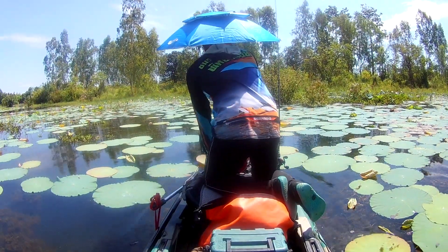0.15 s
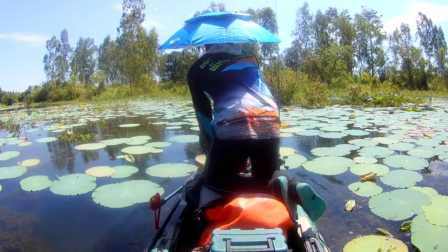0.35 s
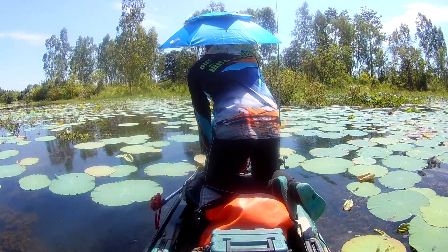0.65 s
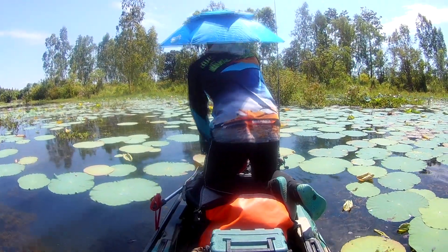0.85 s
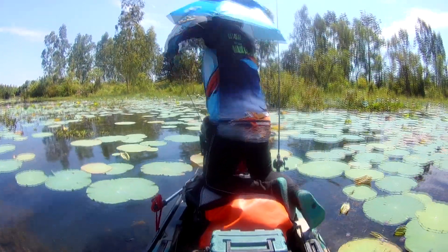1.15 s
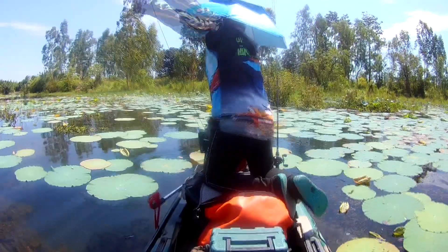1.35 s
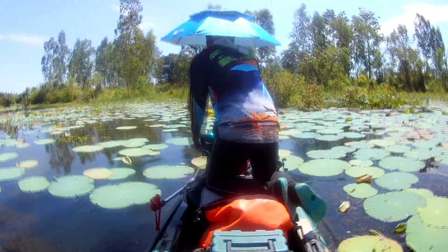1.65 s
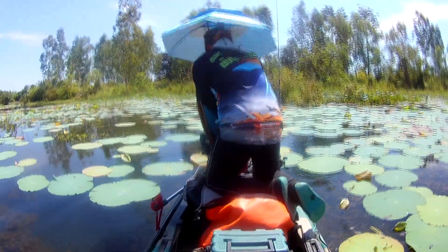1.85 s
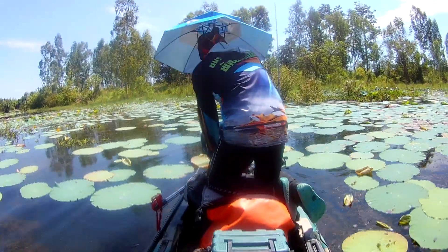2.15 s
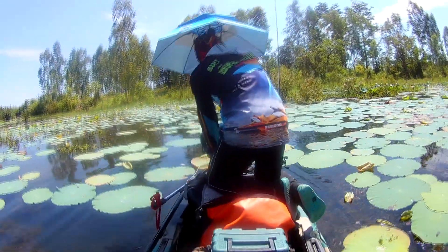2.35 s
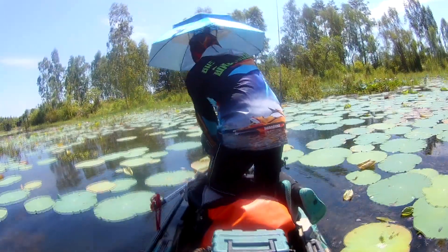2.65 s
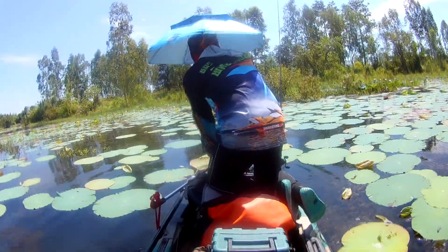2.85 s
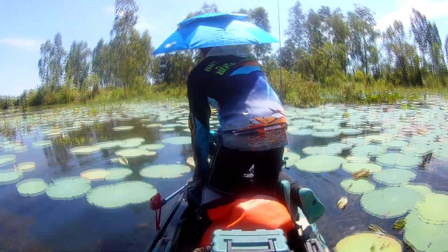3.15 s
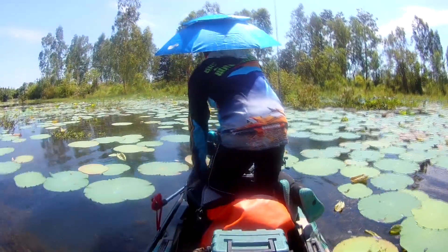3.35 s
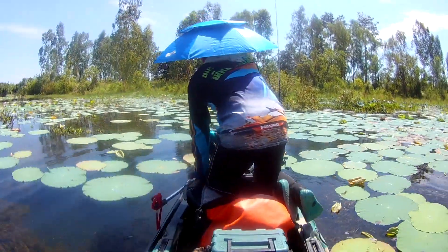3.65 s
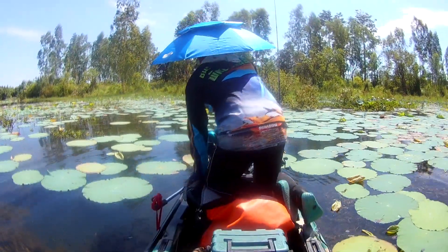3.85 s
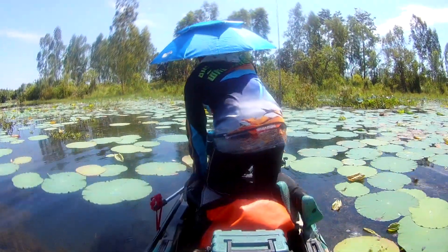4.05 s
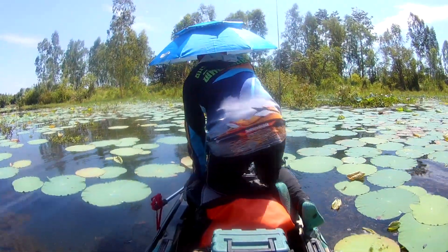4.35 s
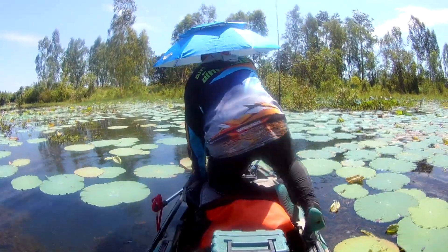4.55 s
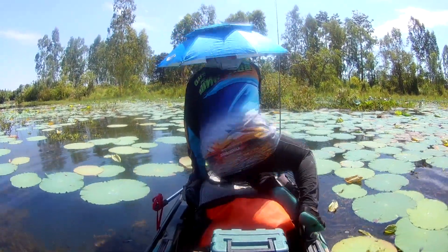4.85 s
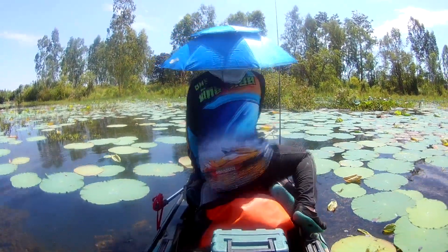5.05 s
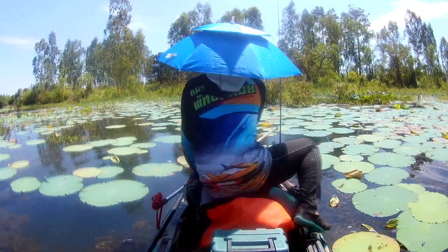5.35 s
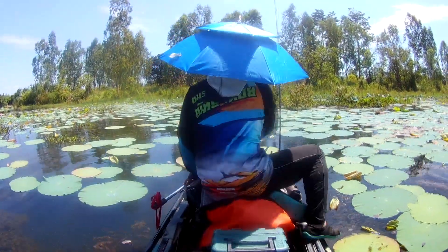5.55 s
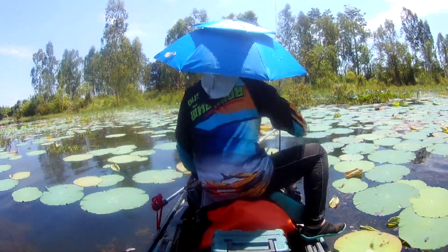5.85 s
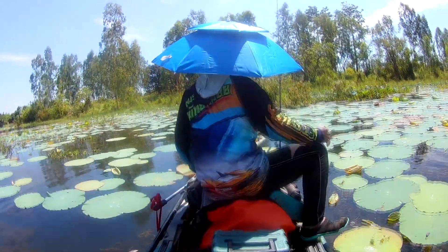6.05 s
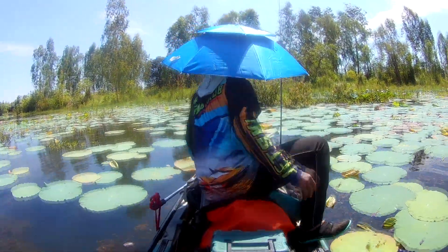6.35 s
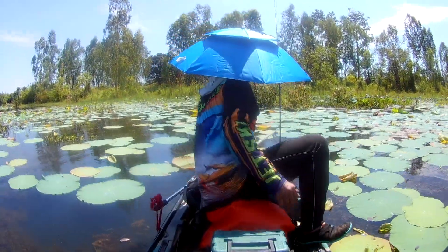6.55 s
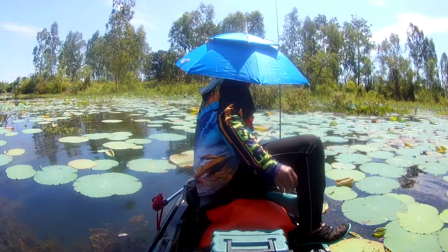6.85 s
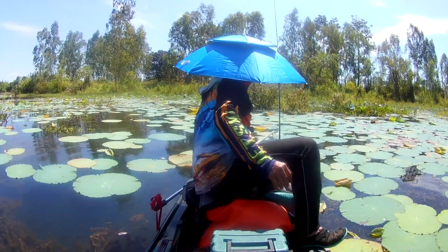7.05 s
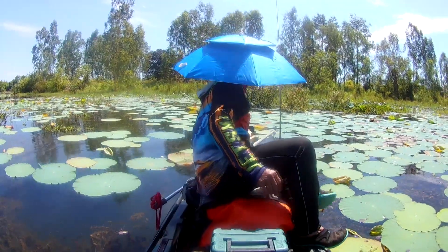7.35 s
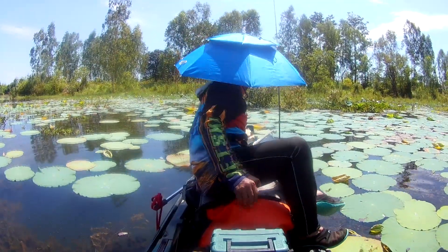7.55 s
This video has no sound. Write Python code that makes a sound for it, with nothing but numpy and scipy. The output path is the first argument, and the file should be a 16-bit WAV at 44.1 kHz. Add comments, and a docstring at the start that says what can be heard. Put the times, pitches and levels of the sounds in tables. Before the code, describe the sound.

A small one-cylinder boat engine is pull-started on a quiet pond, then idles with muffled thumps, rattling gear and jingling metal.

```python
"""On a quiet pond, a small one-cylinder boat engine is pull-started and idles, heard from a closed case
on the hull. First come lapping water, a few handling taps and two faint bird whistles; then the
starter clanks and the boat wallows. Each firing thumps and jolts loose gear, which rattles in surges
through the hull. The engine knocks on its mount, metal parts jingle, and the valves tick until the
engine settles. The case adds a hollow note and muffles the sounds that come through its wall."""
import sys
import numpy as np
from scipy import signal
from scipy.io import wavfile
from scipy.ndimage import uniform_filter1d

SR = 44100
rng = np.random.default_rng(int(sys.argv[2]) if len(sys.argv) > 2 else 0)


def transcribe(signal):
    """Save signal, clipped to [-1, 1], as a 16-bit WAV file at the path in sys.argv[1]."""
    frames = np.atleast_2d(signal).T
    limited = np.clip(frames, -1, 1)
    pcm = np.round(limited * 32767).astype(np.int16)
    wavfile.write(sys.argv[1], SR, pcm)


N = 339570
T = np.arange(N) / SR


def gain_of(db):
    """Turns decibels into a number to multiply by."""
    return 10 ** (np.asarray(db) / 20)


def evened(x):
    """Scales a sound to an average (rms) strength of 1."""
    return x / np.sqrt(np.mean(x ** 2) + 1e-20)


def curve(rows, column, before=-120):
    """Joins a table column with straight lines over time; it starts out at `before`."""
    rows = np.array(rows)
    return np.interp(T, rows[:, 0], rows[:, column], left=before)


def wander(step_s):
    """A wavering line with a new random value every step."""
    knots = np.arange(0, T[-1] + 1, step_s)
    return np.interp(T, knots, rng.standard_normal(len(knots)))


def add(mix, s, sound):
    """Mixes a short sound in at s seconds."""
    part = mix[max(round(s * SR), 0):][:len(sound)]
    part += sound[:len(part)]


def coloured(x, points):
    """Gives a sound the tone colour of (f/Hz, level/dB) points; clicks keep their sharp start."""
    hz, db = np.transpose(points)
    size = 8192
    grid = abs(np.fft.fftfreq(size, 1 / SR))
    grid_db = np.interp(np.log(grid + 1), np.log(hz + 1), db)
    log_gain = np.log(gain_of(np.maximum(grid_db, -100)))
    response = np.exp(np.conj(signal.hilbert(log_gain)))  # nothing rings ahead of a click
    taps = np.fft.ifft(response).real[:size // 2]
    return evened(signal.oaconvolve(x, taps)[:len(x)])


def ring(x, hz, width):
    """Makes a sound ring at one pitch; a smaller width rings longer."""
    r = np.exp(-np.pi * width / SR)
    return 2 * signal.lfilter([1 - r], [1, -r * np.exp(2j * np.pi * hz / SR)], x).real


def clear_ring(x, hz, width):
    """Rings twice over for a cleaner note, at strength 1."""
    return evened(ring(ring(x, hz, width), hz, width))


def rings(x, notes):
    """An object that rings at several (f/Hz, width/Hz, level/dB) notes at once."""
    return sum(gain_of(db) * clear_ring(x, hz, width) for hz, width, db in notes)


def chatter(per_s, spread_db, hiss):
    """Random hits of very unequal size, over a hiss of hits too many to tell apart."""
    size = gain_of(spread_db * np.minimum(rng.exponential(1, N), 4))
    sign = rng.choice([-1., 1.], N)
    hit = rng.random(N) < per_s / SR
    return evened(size * sign * hit) + hiss * rng.standard_normal(N)


# tone colour of air and water: f/Hz, level/dB
POND_COLOUR = [(12, -27), (20, 8.5), (42, 3), (81, -5), (137, -1), (454, -16.5), (567, -14.5), (1140, -23),
               (1270, -21.5), (3880, -38), (15600, -56.5)]

def pond():
    """Soft air noise and small lapping waves, heard through the case."""
    return gain_of(-56.5) * coloured(chatter(per_s=36, spread_db=3, hiss=2.8), POND_COLOUR)


# bird calls, one list for each whistle: t/s, f/Hz, level/dB
BIRD_WHISTLES = [
    [(0.38, 2650, -87), (0.41, 2838, -82), (0.456, 2992, -79), (0.48, 2887, -90)],
    [(0.65, 2684, -88), (0.698, 2692, -81), (0.746, 2630, -86), (0.78, 2758, -85), (0.79, 2691, -97)],
]

def bird():
    """A far bird whistles pure, sliding tones."""
    out = np.zeros(N)
    for rows in BIRD_WHISTLES:
        s, hz, db = np.transpose(rows)
        t = np.arange(s[0], s[-1], 1 / SR)
        phase = 2 * np.pi * np.cumsum(np.interp(t, s, hz)) / SR
        add(out, s[0], np.sqrt(2) * gain_of(np.interp(t, s, db)) * np.sin(phase))
    return out


# swell of the water under the boat: t/s, level/dB
SLOSH = [(1.15, -70), (1.3, -47), (1.6, -42.5), (2.0, -45), (2.6, -62)]

def wallow():
    """The pull on the starter rocks the boat, and water sloshes deep under the hull."""
    level_db = np.where(T < SLOSH[-1][0], curve(SLOSH, 1), -120)
    return gain_of(level_db) * clear_ring(rng.standard_normal(N), hz=38, width=28)


# notes of the starter housing: f/Hz, width/Hz, level/dB
STARTER_NOTES = [(2500, 110, 8), (2720, 120, 2.5), (3610, 90, 0), (4340, 110, -0.5), (5070, 160, -4),
                 (6330, 90, -11)]
# taps and clanks: t/s, relative level/dB, body f/Hz, then ring, case and treble each as level/dB
# over the body, and last the time to fade by 60 dB, t/s
TAPS_AND_CLANKS = [(.003, -39, 670, -24, -15, -20, 0.24), (.03, -35.5, 1930, -22, -9, -10, 0.059),
                   (.357, -53, 1270, -4, 4, -30, 0.074), (.538, -43, 940, 4, 9, -50, 0.1),
                   (.877, -42.5, 685, 3, -1, 2, 0.035), (.902, -27.5, 1446, 4, 7.5, -28, 0.051),
                   (.945, -40, 600, -8, 8, -39, 0.053), (1.049, -28.5, 620, -4, 9.5, -30, 0.022),
                   (1.311, -19.5, 1555, 12.5, 10, -6, 0.05), (1.465, -19, 1010, -6, 9, -23, 0.13),
                   (1.834, -15, 1400, -13, 5, -8, 0.12)]

def clanks():
    """Handling taps and starter clanks: a dying scrape shakes the struck part, case and housing."""
    t, out = np.arange(6000) / SR, np.zeros(N)
    bright_band = signal.butter(4, [2700, 6300], "band", fs=SR, output="sos")
    for s, db, hz, ring_db, case_db, treble_db, fade_s in TAPS_AND_CLANKS:
        fade = gain_of(-60 * t / fade_s) * np.minimum(t / .0007, 1)
        scrape, fizz = fade * rng.standard_normal((2, len(t)))
        body_band = signal.butter(3, [hz / 1.9, hz * 1.37], "band", fs=SR, output="sos")
        body = evened(signal.sosfilt(body_band, scrape))
        body += gain_of(ring_db) * clear_ring(scrape, hz, 160)
        case = clear_ring(scrape, CASE_NOTES[0][0], 230)
        case += .45 * evened(ring(scrape, CASE_NOTES[1][0], 28))
        treble = .6 * evened(signal.sosfilt(bright_band, fizz)) + rings(fizz, STARTER_NOTES)
        clank = body + gain_of(case_db) * evened(case) + gain_of(treble_db) * evened(treble)
        add(out, s, gain_of(db - 13) * np.sqrt(np.mean(fade ** 2)) * clank)
    return out


# crisp snaps: t/s, relative level/dB
SNAP_HITS = [(0.8994, -62), (1.258, -61), (1.3124, -50), (1.4651, -63), (1.5958, -70), (1.701, -70),
             (1.8347, -58), (2.0443, -71), (2.2348, -66.5), (2.387, -63), (2.4643, -69), (2.5501, -65),
             (2.6339, -68), (3.2076, -72)]
# their tone colour: f/Hz, level/dB
SNAP_COLOUR = [(6000, -37.5), (8000, -3.5), (8900, 2.5), (10200, -5.5), (10800, -7.5), (12400, -0.5),
               (13300, -12.5), (15500, -20), (17000, -43)]

def snaps(fired):
    """Gritty, very high snaps arrive through the air; every firing adds a faint one."""
    t, level = np.arange(SR // 8) / SR, np.zeros(N)
    shape = gain_of(-60 * t / .05) * np.minimum(t / .001, 1)
    for hits, offset_db in [(SNAP_HITS, -8), (fired, -63.5)]:
        for s, db in hits:
            add(level, s, gain_of(db + offset_db) * shape)
    return level * coloured(chatter(1500, 2.5, .7), SNAP_COLOUR)


# ticks of the valve gear: t/s, relative level/dB
VALVE_TICKS = [(1.2378, -51), (1.2887, -52), (1.3113, -30.5), (1.345, -46), (1.3715, -42), (1.4036, -45),
               (1.4318, -50), (1.449, -46), (1.468, -32.5), (1.5236, -50), (1.5391, -49), (1.5601, -45),
               (1.586, -42), (1.6593, -43), (1.7541, -50), (1.7756, -50), (1.841, -32), (1.967, -53),
               (2.1223, -43), (2.1397, -45), (2.1722, -52), (2.1931, -50), (2.2161, -45), (2.2305, -41),
               (2.2605, -38), (2.3857, -46), (2.4416, -46), (2.4635, -46), (2.4825, -46), (2.557, -44),
               (2.6461, -44.5), (2.7229, -46), (2.7733, -52), (2.7972, -48), (2.8177, -49), (2.8875, -41),
               (2.9215, -50), (2.9399, -54), (3.0502, -46), (3.2088, -46), (3.3006, -50)]
TICK_HZ, TICK_WIDTH_HZ, SETTLED_S = 3520, 680, 3.3

def valve_ticks():
    """The valves tick with one broad metal ring until the engine settles; faint strays fall between."""
    t, out = np.arange(400) / SR, np.zeros(N)
    gap_s = 1 / 60  # between stray ticks, on average
    slots = np.arange(.91, SETTLED_S - gap_s, gap_s)
    late, loud = rng.random((len(slots), 2)).T
    before_firing = slots < ENGINE_PACE[0][1]
    strays = list(zip(slots + late * gap_s, -62.5 - 12 * before_firing + 12 * loud))
    for s, db in [(s, db - 3.5) for s, db in VALVE_TICKS] + strays:
        add(out, s, gain_of(db - 60 * t / .026) * rng.standard_normal(len(t)))
    width = 2.8 * TICK_WIDTH_HZ
    return gain_of(7) * ring(ring(out, TICK_HZ, width), TICK_HZ, width)


# how hard the boat shakes: t/s, rattle level/dB, then harsh band and treble as level/dB relative to it
BOAT_SHAKE = [(.84, -78, 2, -11), (.91, -55.5, 11, -3.5), (.93, -51.5, -5, -34), (1.2, -48.5, 2.5, -21),
              (1.27, -29.5, -8.5, -30), (1.42, -26, -11, -43), (1.47, -17, -6, -30), (1.53, -25, -8.5, -41),
              (1.64, -21, -8, -36), (1.76, -33, -7, -34), (1.93, -38.5, -2.5, -34), (2.08, -27, -9.5, -33),
              (2.16, -32, -4, -37), (2.29, -20.5, -2, -32), (2.35, -32, -6.5, -35), (2.8, -32.5, -4, -32.5),
              (3.19, -36.5, -5, -36), (3.34, -33.5, -3.5, -31), (3.46, -24.5, -7.5, -36.5),
              (3.59, -22.5, -3.5, -33.5), (3.69, -32.5, -5, -29), (3.8, -35.5, -4, -29),
              (3.9, -28, -5.5, -32), (4.41, -33.5, -7.5, -33.5), (4.53, -26.5, -6.5, -34),
              (4.62, -32, -5.5, -31), (4.715, -26.5, -4.5, -38), (4.75, -23, 1, -29.5),
              (4.81, -20.5, -3.5, -37), (4.895, -30, -7, -38), (4.935, -20.5, 0.5, -32),
              (4.97, -24.5, -5.5, -36), (5.07, -34, -5.5, -35.5), (5.23, -23.5, -5.5, -32.5),
              (5.32, -29, -8, -37), (5.46, -24, -4, -33.5), (5.54, -34.5, -4, -30), (5.64, -26, -8, -41),
              (5.7, -35, -4.5, -33), (5.77, -24.5, -5, -35), (5.9, -33.5, -7.5, -33.5),
              (6.34, -31.5, -6, -31.5), (6.4, -23.5, -5, -38), (6.51, -34.5, -8.5, -32),
              (6.8, -30.5, -6.5, -33), (6.86, -19.5, -7.5, -37), (6.95, -23.5, -8.5, -39),
              (7.03, -18, -6.5, -33.5), (7.14, -19, -5, -34.5), (7.24, -23.5, -8, -35.5),
              (7.32, -18, -5.5, -32.5), (7.45, -26.5, -10.5, -46), (7.6, -31.5, -9.5, -36.5),
              (7.65, -24.5, -8, -36), (7.7, -22.5, -9.5, -39)]
CALM_DB, CALM_TREBLE_DB = -29, -67.5  # shaking at a calm idle

def shaking():
    """The surges in dB: rattle over calm, treble over calm, and harsh band over rattle."""
    rattle_db, harsh_db, treble_db = (curve(BOAT_SHAKE, column) for column in (1, 2, 3))
    return rattle_db - CALM_DB, rattle_db + treble_db - CALM_TREBLE_DB, harsh_db


# how loudly the clearest metal rings: t/s, level/dB
RING_SWELLS = [(1.25, -75), (1.45, -77), (1.46, -50), (1.54, -73), (1.8, -80), (1.84, -62), (1.91, -78),
               (2.2, -72), (2.27, -52.5), (2.38, -80), (4.2, -73.5), (4.27, -84), (4.72, -72), (4.75, -58),
               (4.91, -69), (4.94, -55), (5.04, -75), (5.08, -71), (6.33, -78.5), (6.4, -67), (6.6, -80),
               (7.1, -57.5), (7.61, -77.5), (7.65, -64), (7.7, -74)]
# its notes: f/Hz, width/Hz, level/dB
RING_NOTES = [(3730, 55, 0), (4675, 80, -9), (2400, 40, 5)]

def ringing_metal(shared_hits):
    """Loose metal rings at a few clear notes, each struck by shared hits and by its own."""
    swell_db = curve(RING_SWELLS, 1)
    return sum(gain_of(swell_db + db) * clear_ring(shared_hits + chatter(89, 2.9, .25), hz, width)
               for hz, width, db in RING_NOTES)


# notes of the loose metal parts: f/Hz, width/Hz, level/dB
METAL_NOTES = [(3300, 65, -2.5), (4240, 49, -5.5), (5240, 45, 0.5), (5450, 44, 8), (6340, 70, -32),
               (7160, 40, -25.5), (8520, 140, -27), (9340, 63, -29), (9650, 50, -32), (10000, 80, -31),
               (11350, 60, -29), (12200, 94, -27.5), (12800, 75, -36)]
# bursts of jingling: t/s, relative level/dB
JINGLE_BURSTS = [(1.2513, -57), (1.3122, -43), (1.3731, -54), (1.4618, -58), (1.5402, -65), (1.5861, -62),
                 (1.6255, -62), (1.6574, -54), (1.7068, -50), (1.8345, -54), (2.0111, -63), (2.046, -56),
                 (2.2161, -48), (2.3857, -60), (2.5559, -57), (2.723, -53), (3.0517, -49), (3.2079, -50),
                 (3.4678, -58), (3.5671, -61), (3.8629, -46), (3.9053, -53), (3.9537, -62), (4.0415, -52),
                 (4.3064, -58), (4.3473, -57), (4.4436, -54), (4.5159, -60), (4.7015, -47), (4.7389, -62),
                 (4.7858, -55), (4.8566, -62), (4.934, -52), (5.1899, -57), (5.2512, -67), (5.3056, -66),
                 (5.4189, -49), (5.4707, -57), (5.5945, -46), (5.7002, -60), (5.7875, -60), (6.2405, -51.5),
                 (6.3657, -64), (6.4001, -57), (6.6615, -55), (6.9, -55), (6.9783, -51), (7.0357, -60),
                 (7.1404, -61), (7.2033, -57), (7.2861, -55), (7.334, -48), (7.6194, -54), (7.6623, -56)]
# stretches where the middle notes keep singing: start t/s, end t/s, level/dB
METAL_SINGS = [(3.41, 3.75, -74.5), (3.86, 3.98, -81), (4.12, 4.24, -75), (5.25, 5.3, -80),
               (5.38, 5.52, -74), (5.58, 5.64, -73), (5.7, 5.8, -83)]

def jingle(shared_hits, jolt):
    """Scattered hits make small metal parts jingle; the high notes wake in hard shaking."""
    shake_db, bright_db, _ = shaking()
    asleep_db = -8 * (T < 2)  # low and high notes are weaker early on
    low = gain_of(-78 + 1.2 * bright_db + asleep_db)
    middle = gain_of(-85 + .72 * shake_db + 8 * jolt)
    high = gain_of(-73 + 1.6 * bright_db + asleep_db)
    t, first_blows = np.arange(SR // 4) / SR, np.zeros(N)
    rise_s, fade_s = .0025, .1
    for s, db in JINGLE_BURSTS:
        burst = gain_of(db - 12 - 60 * t / fade_s) * np.minimum(t / rise_s, 1)
        add(middle, s, burst)
        add(high, s, gain_of(6.5) * burst)
        add(first_blows, s + rise_s, gain_of([21.5]))
    for start, end, db in METAL_SINGS:
        middle += gain_of(db) * np.clip(np.minimum(T - start, end - T) / .012, 0, 1)
    together, out = wander(.035), np.zeros(N)
    for hz, width, db in METAL_NOTES:
        strikes = evened(shared_hits + chatter(110, 3, .6)) + first_blows * rng.uniform(-1, 1, N)
        if hz < 6000:
            strikes *= low if hz < 5000 else middle
        else:  # high notes come and go, partly together
            strikes *= high * gain_of(3.2 * together + 2.16 * wander(.035))
        make_up = np.sqrt(SR / (2 * np.pi * width))  # keeps narrow notes as loud as wide ones
        out += gain_of(db) * make_up * ring(ring(strikes, hz, 1.1 * width), hz, 6.2 * width)
    return out


# the hollow note of the case: t/s, f/Hz, level/dB over the rattle
HOLLOW_NOTE = [(.9, 570, 4), (1.25, 571, -11), (1.28, 623, -20), (1.77, 568, -9), (1.82, 606.6, -5.5),
               (3.91, 617.6, 0.5), (4.0, 580, -1.5), (4.39, 628, -4.5), (5.92, 605.6, -6), (6.12, 634, -2),
               (6.8, 619.4, -3.5), (7.57, 628, -9), (7.61, 650, -3.5), (7.7, 617, -10.5)]

def hollow_note(hits):
    """The case rings with a hollow note that wanders in pitch and swells."""
    _, first_hz, first_db = HOLLOW_NOTE[0]
    hz = curve(HOLLOW_NOTE, 1, before=first_hz) + 11 * wander(.03)
    turn = np.exp(2j * np.pi * np.cumsum(hz) / SR)
    r = np.exp(-np.pi * 87 / SR)  # 87 Hz wide
    # shift the note down to 0 Hz, smooth twice, shift it back up
    smooth = signal.lfilter([1], np.convolve([1, -r], [1, -r]), hits / turn)
    return gain_of(curve(HOLLOW_NOTE, 2, before=first_db)) * evened((turn * smooth).real)


# notes of the case's air and walls, and of the loose gear: f/Hz, width/Hz, level/dB
CASE_NOTES = [(637, 184, 2), (566, 100, 0), (335.5, 73, -10.5)]
GEAR_NOTES = [(995, 9, -23.5), (1426, 53, -13), (1554, 94, -14.5), (2650, 69, -49.5)]
# tone colours of the rattle's harsh middle and its treble: f/Hz, level/dB
HARSH_COLOUR = [(410, -32), (700, 0), (767, -2.5), (1020, -0.5), (1290, -9), (1460, -10), (1650, -15),
                (1910, -17.5), (2450, -21.5), (3000, -66.5), (3900, -46.5), (6600, -120)]
TREBLE_COLOUR = [(1590, -25.5), (2700, 7), (2960, -7), (3660, -4), (4970, -9.5), (5400, -7), (5640, -15),
                 (5790, -12), (7600, -21), (9880, -49), (16700, -120)]

def gear_rattle(jolt):
    """Loose gear rattles; the same hits sound in the case, in a harsh band above it and as treble."""
    shake_db, bright_db, harsh_db = shaking()
    hits = chatter(900, 2.6, .9)
    case = evened(rings(hits, [(hz, 1.01 * width, db) for hz, width, db in CASE_NOTES]))
    case = gain_of(-4) * case + hollow_note(hits)
    harsh = evened(coloured(hits, HARSH_COLOUR) + rings(hits, GEAR_NOTES))
    treble = coloured(hits + 6.1 * chatter(200, 1.9, .87), TREBLE_COLOUR)
    treble += .5 * clear_ring(chatter(70, 2.6, 0), TICK_HZ, TICK_WIDTH_HZ)
    rattle = gain_of(CALM_DB + shake_db + 2 * jolt) * (case + gain_of(harsh_db) * harsh)
    return rattle + gain_of(-69.5 + bright_db + 9 * jolt) * treble


# tone colour of the droning hull: f/Hz, level/dB
DRONE_COLOUR = [(12, -51.5), (20, -4.5), (54, -18), (84, -0.5), (113, -4), (190, -7.5), (271, -14),
                (321, -13.5), (361, -15.5), (450, -21), (580, -34.5), (990, -120)]

def hull_drone(jolt):
    """The shaken hull drones and its panels boom."""
    shake_db, _, _ = shaking()
    hits = chatter(140, 2.2, .93)
    boom = gain_of(-8) * clear_ring(hits, hz=112.1, width=22)
    drone = evened(coloured(hits, DRONE_COLOUR) + boom)
    follows = np.where(shake_db > -10, .48, 1)  # grows more slowly once the shaking is strong
    return gain_of(-31.5 + follows * (shake_db + 6) + 5.5 * jolt) * drone


# big knocks: t/s, relative level/dB of the high notes, level/dB of the low notes over them
MOUNT_KNOCKS = [(1.2515, -28, -4), (1.2861, -32, 14.5), (1.3111, -30.5, 10), (1.3719, -34, 7),
                (1.4104, -28, 15.5), (1.4488, -21, -8), (1.5406, -18, 8.5), (1.587, -17.5, 6.5),
                (1.6396, -21, 9), (1.6997, -27, 2), (1.7768, -32, 16), (1.8419, -21, -7), (2.068, -39, 18),
                (2.082, -29, 5), (2.1195, -25.5, 15.5), (2.291, -24, 2), (2.334, -29, 2.5),
                (2.3826, -26, 4), (2.4221, -31, 2), (2.4641, -27, 15.5), (2.504, -33, 3),
                (2.5576, -24, 11.5), (2.6405, -21, 7.5), (2.7217, -30.5, 5.5), (2.7976, -20.5, 10),
                (2.8847, -25, 10.5), (3.0253, -32.5, 10), (3.053, -23.5, 7), (3.1289, -30, 13.5),
                (3.2123, -35, 16), (3.532, -29, 5), (4.021, -39, 6), (4.178, -46.5, 26), (4.267, -45, 13),
                (4.3522, -32, 12.5), (4.432, -30, -4), (4.5163, -28, -5), (4.6813, -34.5, 13.5),
                (5.3331, -33, 17), (5.3649, -28, 1), (5.4596, -28, -1), (5.4951, -27, 3.5),
                (5.826, -36.5, 19), (5.905, -51, 4), (6.046, -35.5, 12.5), (6.2, -46, 14),
                (6.2364, -29, -5), (6.3155, -39.5, 19), (6.376, -38, 17), (6.403, -35, 23),
                (6.479, -39.5, 22.5), (6.6407, -38.5, 15.5), (6.7243, -39, 15), (6.7722, -24.5, -2.5),
                (7.46, -40, 11)]
# notes of the mount: f/Hz, time to fade by 60 dB t/s, level/dB, highness (0 low note, 1 high note)
MOUNT_NOTES = [(789, 0.011, 4.5, 0.0064), (531, 0.016, -1.5, 0.079), (1072, 0.016, -12.5, 0),
               (1365, 0.011, -12.5, 0), (2120, 0.014, -9, 0.51), (1720, 0.016, -16.5, 0.56),
               (2430, 0.009, -18, 1), (2760, 0.0074, -24.5, .9), (3650, 0.014, -31, 1)]

def mount_knocks(fired):
    """The engine knocks on its mount, which rings briefly and a little differently each time."""
    t, out = np.arange(1500) / SR, np.zeros(N)
    seating = [(s + .003475, db - 19.5, 9) for s, db in fired]  # each firing seats the engine softly
    gap_s = 1 / 34  # between small knocks, on average
    slots = np.arange(ENGINE_PACE[0][1], T[-1], gap_s)
    clatter = [(s + late * gap_s, -48.5 + 10 * loud, 6 + 10 * deep)
               for s, (late, loud, deep) in zip(slots, rng.random((len(slots), 3)))]
    for s, db, low_db in [*MOUNT_KNOCKS, *seating, *clatter]:
        for hz, fade_s, note_db, highness in MOUNT_NOTES:
            bend, luck = rng.uniform(-.83, 1, 2)
            rise = 1 - np.exp(-(t / (.0012 - .00021 * highness)) ** 2)  # low notes build up later
            level_db = db + note_db + low_db * (1 - highness) + 2.5 * luck + 10
            tone = np.sin(2 * np.pi * hz * (1 + .07 * bend) * t)
            add(out, s, gain_of(level_db - 60 * t / fade_s) * rise * tone)
    return out


# the engine speeds up to its idle: firing number, t/s
ENGINE_PACE = [(0, 1.273), (2, 1.497), (4, 1.705), (6, 1.876), (10, 2.223), (12, 2.379), (16, 2.728),
               (20, 3.046), (24, 3.364), (54, 5.822), (68, 6.96), (77, 7.699)]
# strength of the firings: t/s, level/dB, level/dB taken off every second firing
FIRING_STRENGTH = [(1.27, -30, 9), (1.5, -14, 17.5), (1.9, -18.5, 7.5), (2.22, -25.5, 21), (2.3, -37, 8),
                   (2.38, -22, 4), (2.55, -31, 3.5), (2.72, -18, 19), (3.3, -18.5, 1.5), (3.42, -27, -12),
                   (3.65, -15, 3.5), (3.801, -15, 13), (4.049, -18.5, 3), (4.851, -17, -2),
                   (5.05, -16, 13.5), (5.35, -16, 0), (5.55, -19.5, -2), (5.801, -15, 1.5), (6.6, -17.5, 0),
                   (6.9, -14.5, -0.5), (7.7, -17.5, 2.5)]

def firings():
    """The cylinder's slightly uneven, often limping beat, as rows of t/s, level/dB."""
    number, s = np.transpose(ENGINE_PACE)
    count = np.arange(int(number[-1]))
    times = np.interp(count, number, s)
    when, full_db, drop_db = np.transpose(FIRING_STRENGTH)
    db = np.interp(times, when, full_db) - count % 2 * np.interp(times, when, drop_db)
    return np.transpose([times + .0018 * rng.standard_normal(len(count)), db])


def jolts(fired):
    """Each firing jolts the loose gear: a quick rise and a slower fall, swinging around zero."""
    t, out = np.arange(SR // 5) / SR, np.zeros(N)
    shape = np.minimum(t / .0065, 1) * np.exp(-t / .091)
    for s, db in fired:
        add(out, s, min(gain_of(db + 18), 1) * shape)
    return out - uniform_filter1d(out, SR // 6)


def exhaust(fired):
    """Each firing thumps the air: a push, a deep pull and a small rebound."""
    t, out = np.arange(-440, 880) / SR, np.zeros(N)
    swell = np.exp(-(t / np.where(t < 0, .005, .0052)) ** 2)
    thump = -swell * np.cos(2 * np.pi * 128 * t - .25)
    for s, db in fired:
        add(out, s + t[0], gain_of(db) * thump)
    return out


def scene():
    """Mixes everything into one channel; the case wall takes the top treble off engine and boat."""
    fired = firings()
    jolt = jolts(fired)
    engine = exhaust(fired) + mount_knocks(fired) + valve_ticks()
    boat = clanks() + gear_rattle(jolt) + hull_drone(jolt) + wallow()
    metal_hits = chatter(140, 2.8, .6)
    metal = ringing_metal(metal_hits) + jingle(metal_hits, jolt)
    case_wall = signal.butter(8, 6630, fs=SR, output="sos")
    return (pond() + bird() + snaps(fired) + metal + signal.sosfilt(case_wall, engine + boat))[None]


def record(dry):
    """Fades the last 2 ms, adds a faint steady hiss and cuts off the very highest treble."""
    fade_out = np.minimum((T[-1] - T) / .002, 1)
    noisy = fade_out * dry + gain_of(-81) * rng.standard_normal(N)
    padded = np.pad(noisy, ((0, 0), (255, 255)), "reflect", reflect_type="odd")
    treble_cut = signal.firwin(511, 15750, window=("kaiser", 9), fs=SR)
    return signal.oaconvolve(padded, treble_cut[None], "valid")


dry = scene()
out = record(dry)
transcribe(out)
```